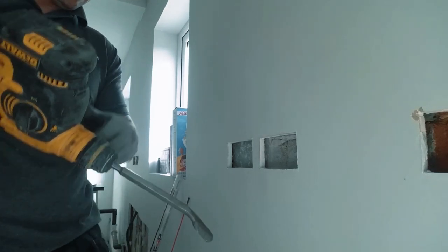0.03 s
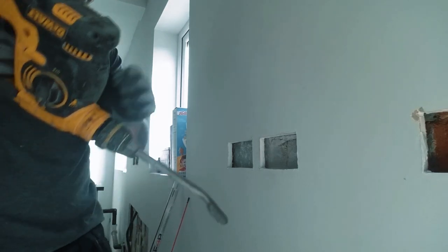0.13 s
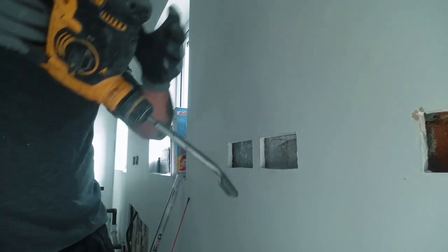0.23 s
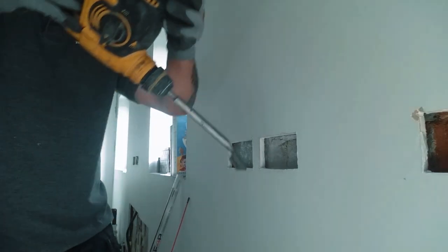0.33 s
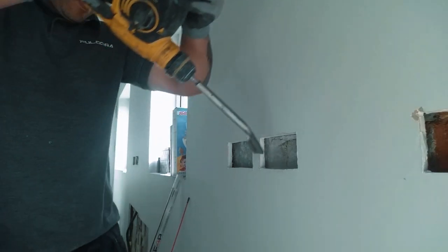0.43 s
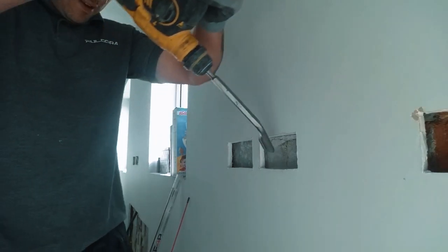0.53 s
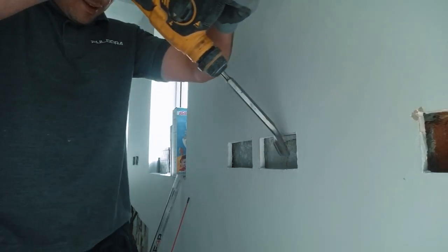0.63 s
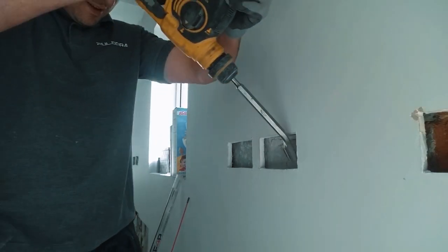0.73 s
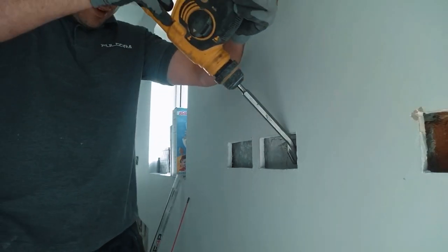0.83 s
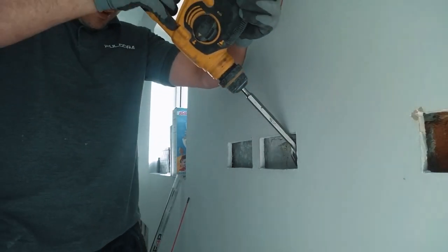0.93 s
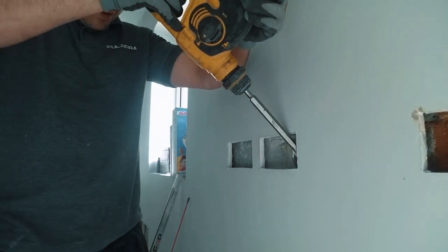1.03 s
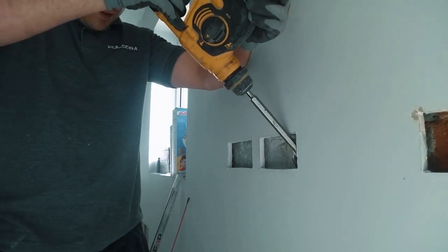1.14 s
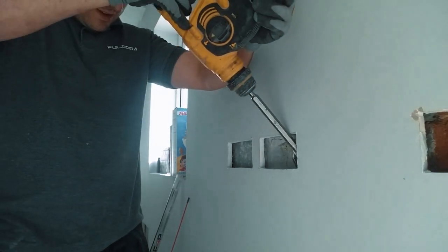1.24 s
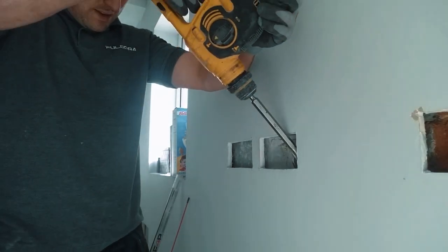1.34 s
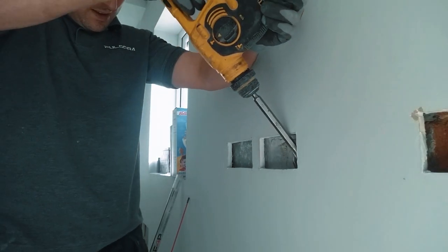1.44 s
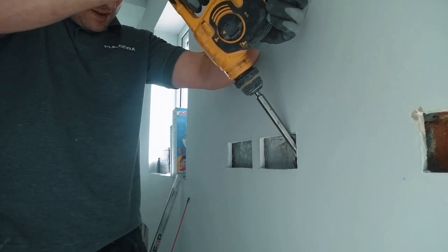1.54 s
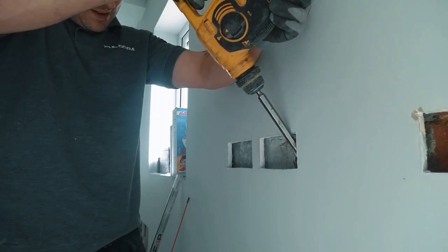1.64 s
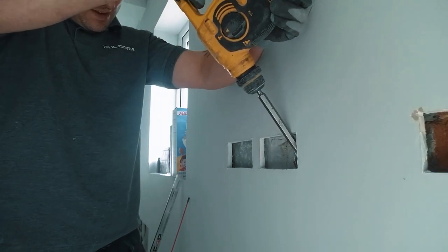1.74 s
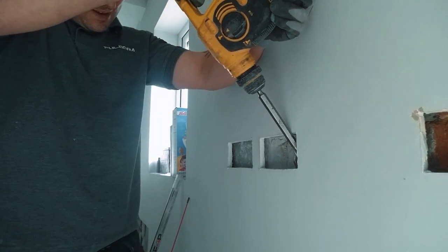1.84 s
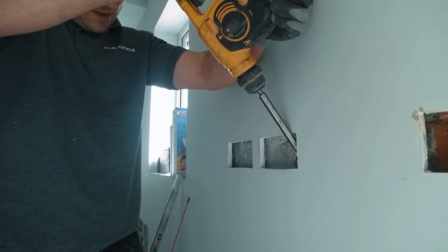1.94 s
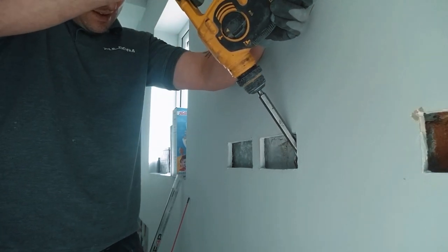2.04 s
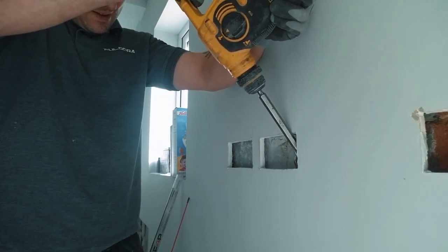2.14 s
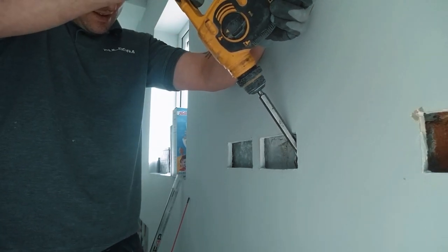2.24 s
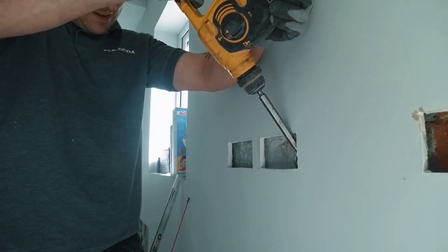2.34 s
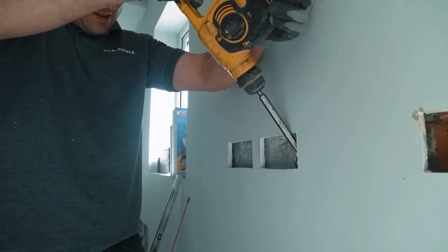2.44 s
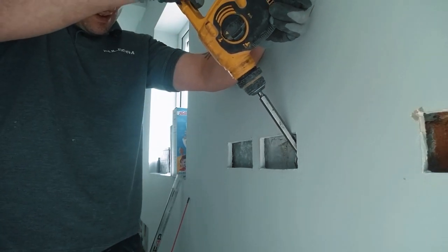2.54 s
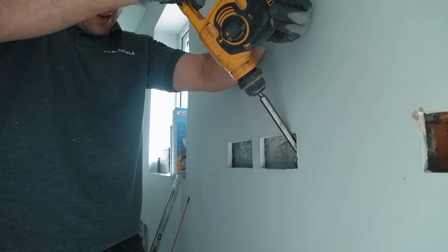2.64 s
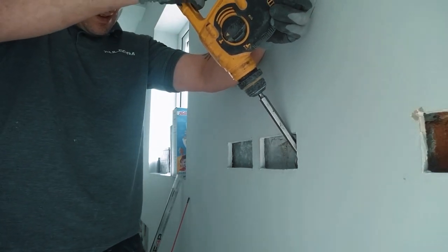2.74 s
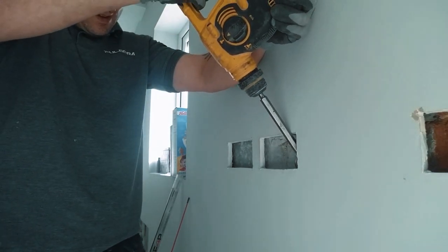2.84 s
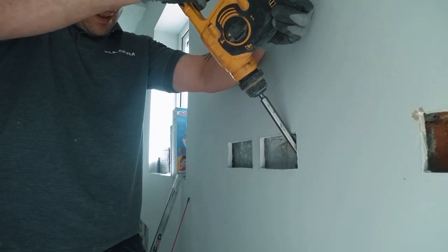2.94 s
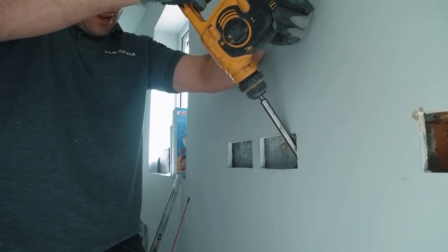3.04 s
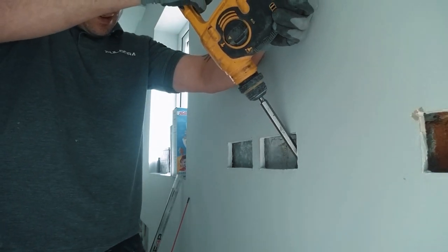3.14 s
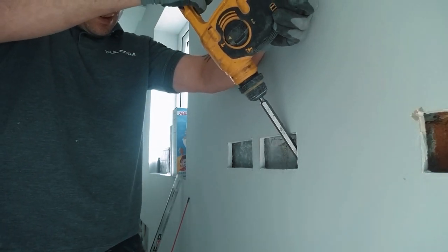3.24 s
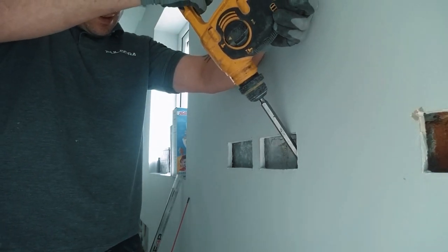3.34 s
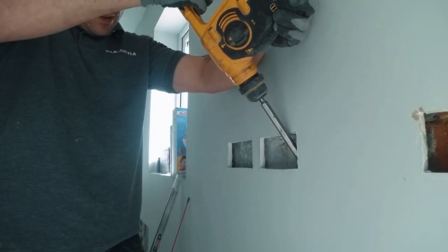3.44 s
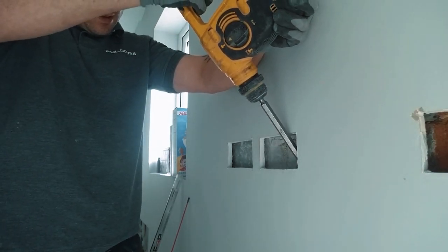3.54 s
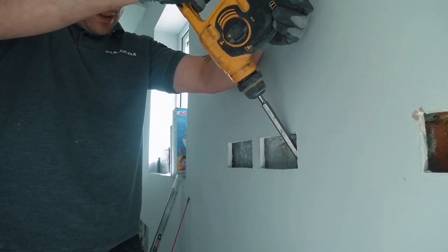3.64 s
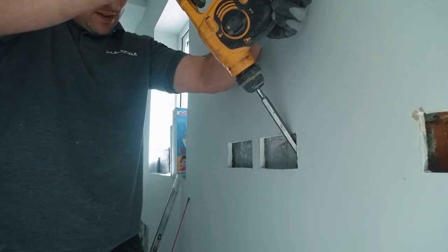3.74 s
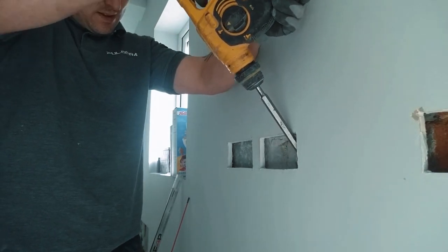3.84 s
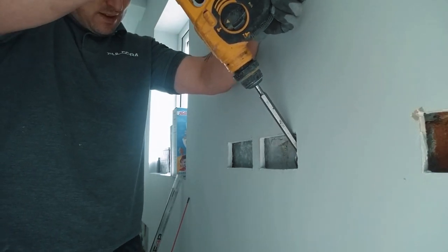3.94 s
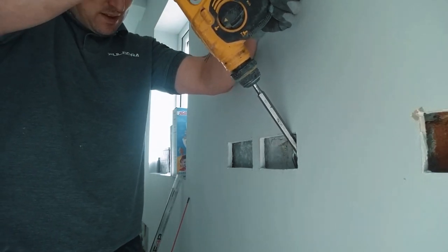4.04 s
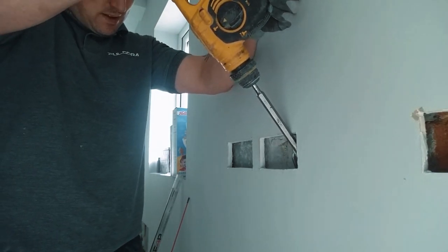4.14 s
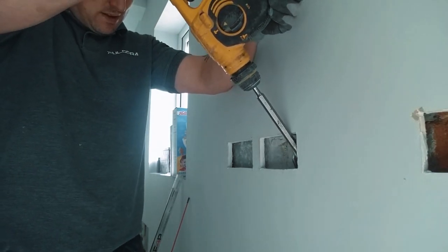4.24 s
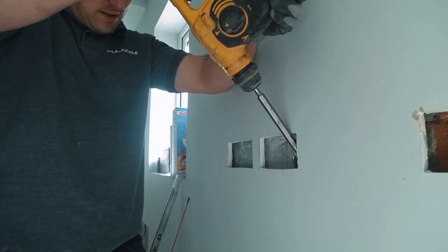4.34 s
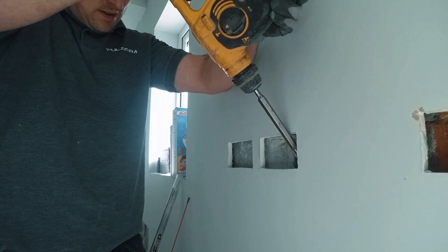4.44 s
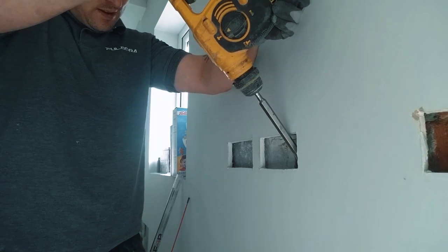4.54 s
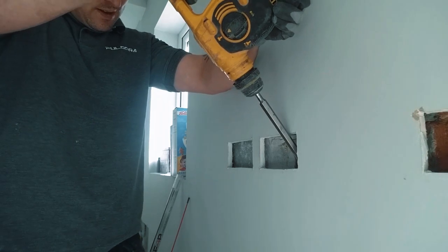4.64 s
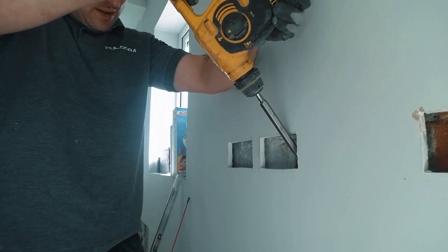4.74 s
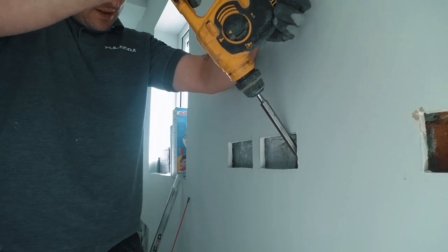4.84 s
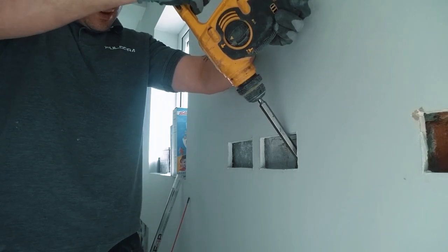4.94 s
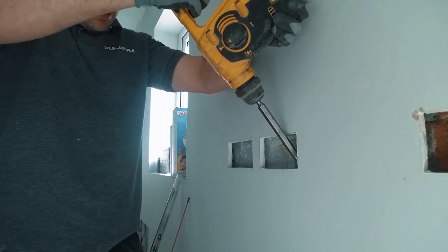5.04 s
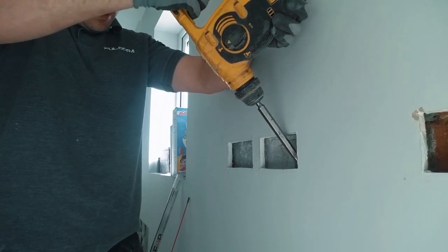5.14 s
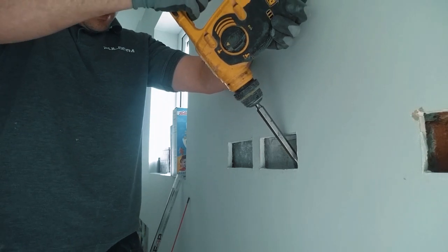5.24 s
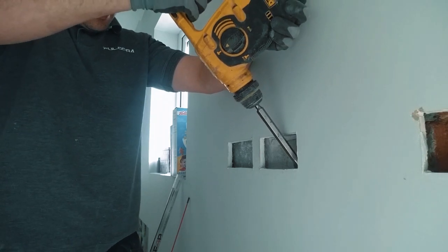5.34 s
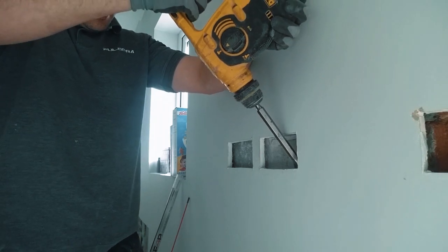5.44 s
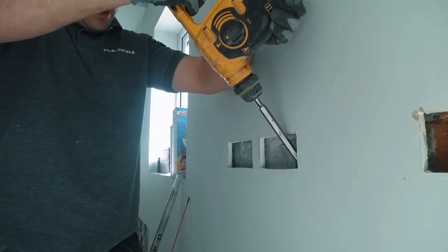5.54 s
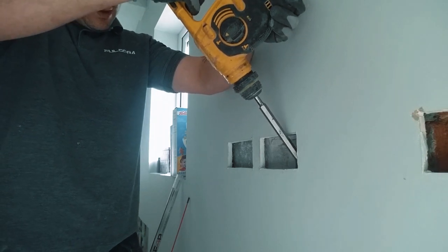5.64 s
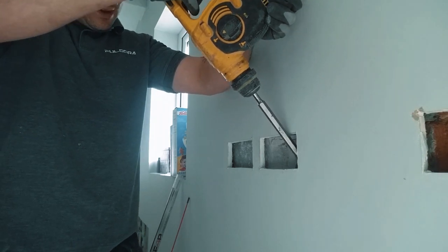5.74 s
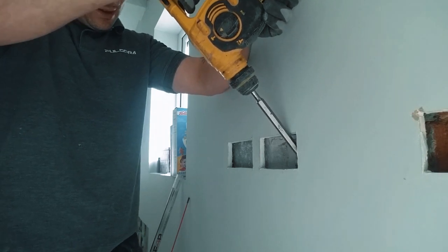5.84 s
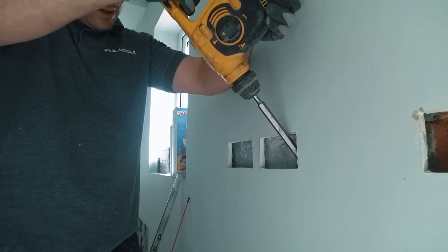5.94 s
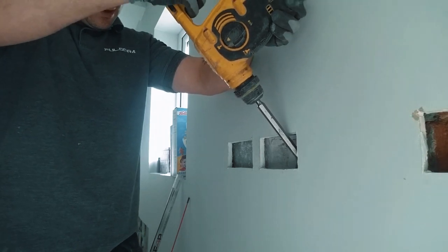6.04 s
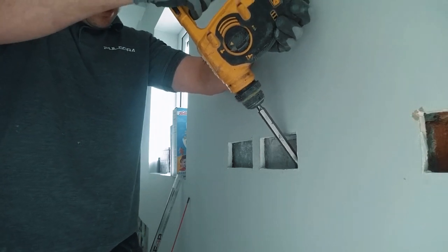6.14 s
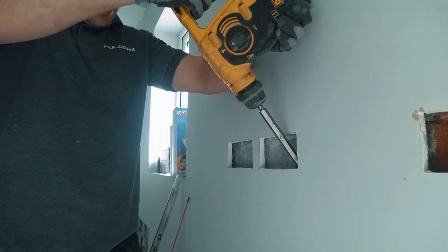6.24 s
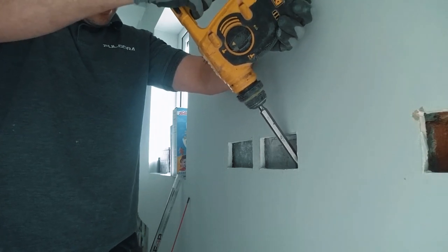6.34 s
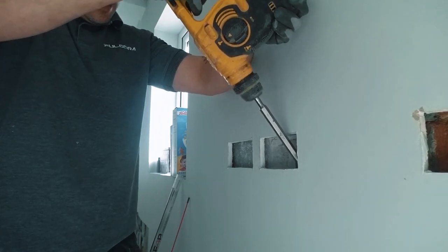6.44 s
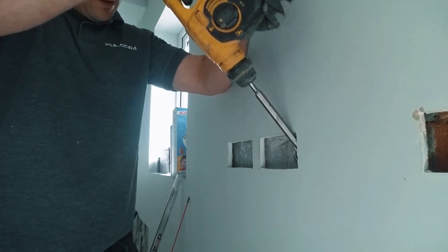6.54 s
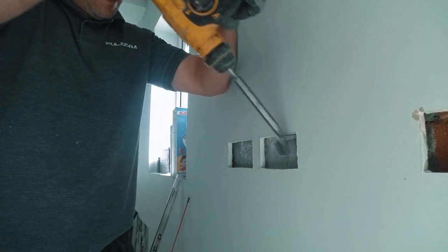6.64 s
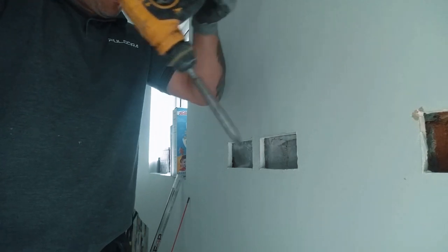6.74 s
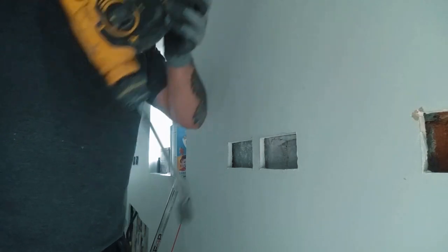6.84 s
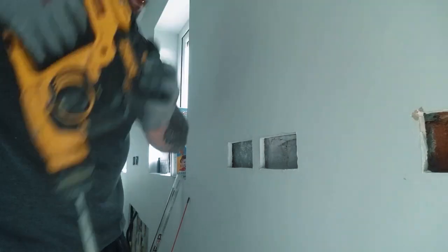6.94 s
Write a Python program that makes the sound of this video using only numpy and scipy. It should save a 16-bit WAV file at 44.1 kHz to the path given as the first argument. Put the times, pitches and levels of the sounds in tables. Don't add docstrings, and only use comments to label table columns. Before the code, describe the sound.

A bare, hard-walled room with a short bright echo, heard by a stereo microphone close to the wall. From 0 to 2 s there is faint low rumble, cloth rustle, soft hollow knocks and gritty steel ticks; a heavy knock lands at 0.9 s and a sharp one at 1.4 s. At 1.95 s a thin high electric whine appears and the hammer starts slowly, about 28 blows a second. From 2.55 to 3.9 s it runs at full speed, sixty blows a second: crackling plaster, bright ringing steel, droning housing, deep thumps mostly left, clipping hard. It coasts down into near quiet with light bumps and trigger clicks. A second, similar burst runs 4.57 to 5.8 s. Clicks come around 6.1 s, then a short, sharp burst from 6.24 to 6.65 s, closing with knocks, rustle and a faint tick.

```python
import sys
import numpy as np
from scipy import signal
from scipy.fft import rfft, irfft
from scipy.io import wavfile
from scipy.ndimage import uniform_filter1d

SR = 44100
rng = np.random.default_rng(int(sys.argv[2]) if len(sys.argv) > 2 else 0)


def store_wav(level_fs):
    pcm = np.round(np.clip(np.atleast_2d(level_fs), -1, 1) * 32767)
    wavfile.write(sys.argv[1], SR, pcm.T.astype(np.int16))


def level_to_linear(level):
    exponent = np.asarray(level, float) / 20
    return 10 ** exponent


N = 308733

# pitch_hz, level_db per Hz
RUMBLE = [(53, -40), (90, -7), (300, -3), (483, -21), (676, -11), (795, -10.5), (1200, -26.5), (1560, -75),
          (2640, -120)]
# pitch_hz, level_db per Hz
RUSTLE = [(290, -29.5), (500, -3), (721, -9.5), (1170, -8), (1520, -13.5), (3020, -15.5), (6100, -23.5),
          (14700, -29.5), (16500, -53)]
# level_db of rumble, rustle, draught
REST_DB = [-64.5, -66.5, -66.5]
# level_db of rumble, rustle, draught
DUCK_DB = [-12.5, -5.5, -19]
# centre_s, rise_db over rest, length_s
HANDLING = [(0.12, 15.5, 0.13), (0.408, 10.5, 0.058), (0.686, 5, 0.13), (1.07, 2.5, 0.12),
            (1.452, 17.5, 0.057), (1.58, 1.5, 0.055), (.54, 6, .03), (1.717, 4, 0.067), (4.16, 10, 0.16),
            (6.81, 12, .05)]

# start_s, peak_db, brightness_db per octave, left_over_right_db
KNOCKS = [(0.014, -37.5, -1.5, -1), (0.148, -35, 5, -2), (0.369, -32.5, -7, 1), (0.873, -6, -1.5, 6),
          (1.137, -31, 4, 4.0), (1.399, -22.5, 4.5, 2), (2.041, -24, 7, -5), (4.234, -45, -8, -1),
          (6.169, -38.5, 10, 1), (6.607, -26.5, 10, 1), (6.705, -23.5, 4.5, 4)]
# pitch_hz, level_db, t60_s
HOLLOW_MODES = [(123.6, -14, 0.75), (160, -28.5, 0.42), (200, -8, 0.69), (307, 3.5, 0.25),
                (354.5, -6.5, 0.57), (436, -9.5, 0.22), (494.3, -15.5, 0.38), (661.5, -5.5, 0.18),
                (830, -6.5, .15), (1210, -21, .2), (1333, -15.5, .3), (2333, -24, .2), (3350, -29.5, .15)]
# pitch_hz, level_db per Hz
THUD = [(47, -20), (80, -14.5), (325, -4), (421, -1.5), (493, 0), (776, -10), (857, -6.5), (1270, -21),
        (2440, -35.5), (9000, -72), (11700, -101), (19800, -120)]
# start_s, peak_db, pitch_hz
TICKS = [(.018, -36, 3670), (.08, -31, 1810), (0.113, -26.5, 3500), (0.15, -25, 3120), (0.385, -28.5, 2480),
         (.479, -39, 1740), (0.536, -33, 1890), (.691, -37, 1710), (0.8748, -16, 2330), (1.141, -35, 5100),
         (1.141, -29.5, 1650), (1.37, -54, 2500), (1.3993, -11.5, 1730), (1.442, -26, 1710),
         (1.442, -32, 5800), (1.781, -38, 1780), (1.968, -29, 1700), (1.463, -25, 1780), (1.646, -32, 2300),
         (1.7608, -42, 1780), (1.918, -37, 1780), (1.98, -19, 1655), (4.3527, -42.5, 1790),
         (4.475, -50, 1610), (4.485, -32, 1680), (6.141, -28.5, 2280), (6.187, -21.5, 5130),
         (6.701, -37, 2000), (6.9056, -42, 3040)]
# start_s, peak_db
TRIGGER_CLICKS = [(4.305, -41), (4.401, -37.5), (4.532, -38), (6.107, -27.5), (6.1665, -25.5)]

# pitch_hz, t60_s
ROOM_DECAY = [(100, 0.24), (260, 0.3), (700, 0.49), (1840, 0.42), (4850, 0.53), (9000, 0.31), (12800, 0.17),
              (15000, 0.15)]
# pitch_hz, level_db
WALLS = [(100, 1.5), (1000, -5.5), (5000, 0.5), (7500, 0), (10000, 0), (12000, -1.5), (16000, 4.5)]

# start_s, end_s, level_db
WHINE = [
    (1.955, 2.15, -50),
    (4.45, 4.56, -60),
]
# pitch_hz, level_db
WHINE_LINES = [(3900, 9), (7850, -2), (11750, -18)]
# pulled_s, let_go_s, crank_stop_s, drone_db, hiss_db
PULLS = [
    (1.967, 2.311, 2.385, -25, -35),
    (2.324, 3.804, 3.92, -26, -28),
    (4.477, 5.649, 5.787, -26.5, -30.5),
    (6.155, 6.585, 6.66, -29, -38.5),
]
# pitch_hz, width_hz, level_db
HOUSING = [(678.8, 32.3, 11), (751, 20, 3), (753, 15, 0.5), (898, 21, -8), (988, 19, -19.5)]

# first_blow_s, blow_count, gap_ms, gap_change_ms per blow, extra_first_gap_ms
RUNS = [
    (2.0394, 12, 35.53, .125, 58.3),
    (2.5517, 79, 16.684, .0013, 9.8),
    (4.568, 72, 17.56, -.0161, 4.4),
    (6.2388, 21, 17.88, -.1255, 5.2),
]
# crack_db, plaster_db, thump_db over the lean
STRENGTH = [(-27.5, -32.5, 2.5), (-22.5, -23.5, -0.5), (-20.5, -21, -0.5), (-18, -19.5, -2)]
COAST_LOSS_DB = [1.1, 0.73, 0.7]
SEATING_DB = [-1.5, -7.5, -1.5]
# time_s, level_db
LEAN = [
    [(2.04, -68), (2.2, -50), (2.52, -37.5)],
    [(2.62, -27.5), (3.12, -28.5), (3.25, -24.5), (3.37, -23.5), (3.45, -37), (3.52, -28.5), (3.79, -30.5),
     (3.87, -67.5)],
    [(4.57, -28.5), (4.61, -42.5), (4.66, -34.5), (4.84, -35), (5.3, -32), (5.67, -31), (5.71, -57.5)],
    [(6.24, -33.5), (6.38, -33), (6.59, -24.5), (6.62, -60)],
]
# time_s, level_db
BITE = [
    [(2.04, -7.5), (2.19, 6.5), (2.35, -3), (2.52, 0)],
    [(2.66, -1), (2.8, 0), (3.2, -0.5), (3.45, -0.5), (3.75, 5)],
    [(4.6, 2), (4.82, -0.5), (5.0, -0.5), (5.3, 3), (5.67, -1.5), (5.72, 4.5)],
    [(6.27, 1), (6.54, -0.5), (6.6, -3)],
]
GRIP_CHANGES = [3.3, 4.2, 5.1, 6.1]
# pitch_hz, t60_s, level_db in each of five grips
BIT_MODES = [(4770, 0.091, -31.5, -8, -8.5, -14.5, -8), (5405, 0.05, -6.5, -5.5, -6, -8.5, -7),
             (6010, 0.1, -10, -9.5, -12.5, -12.5, -14), (8010, .05, -24, -21, -20, -12, -7),
             (9100, .04, -22, -20, -20, -15, -12), (11850, .09, -6, -5, -8, -1, -3),
             (14700, 0.026, -7, 8.5, -13.5, 2.5, 5.5), (14500, 0.025, -26.5, -7, -12, -11, -14.5),
             (14400, .05, -31.5, -27.5, -19, -21.5, -16)]
# pitch_hz, level_db per Hz
CRACK = [(1470, -19.5), (2500, -3), (5730, -8), (7730, -9), (10900, -8), (11800, -2.5), (14300, -10),
         (16000, -11.5), (16500, -46)]
# pitch_hz, level_db per Hz
PLASTER = [(180, -49.5), (300, -11.5), (498, -8.5), (660, -5.5), (806, -2), (918, -2), (1200, -5),
           (1620, -3.5), (5000, -21.5), (6500, -82), (11000, -120)]
# pitch_hz, level_db per Hz
THUMP = [(12, -22), (20, -5), (81, 0.5), (114, 1), (147, 2.5), (179, 0), (209, 2.5), (600, 0.5), (780, -21),
         (1320, -120)]
# pitch_hz, left_over_right_db
PORT_BALANCE = [(60, 22.5), (110, 45.5), (200, 31.5), (380, 9), (700, 7.5), (1290, 10.5), (2380, 5.5),
                (4400, -1.5), (8120, 2), (15000, 7.5)]


def rms_one(x):
    return x / np.sqrt(np.mean(x ** 2) + 1e-20)


def at_hz(points, hz):
    points = np.array(points)
    return np.interp(np.log(hz), np.log(points[:, 0]), points[:, 1])


def colour(x, points):
    hz = np.maximum(np.arange(2049) * SR / 4096, 1)
    cepstrum = irfft(np.log(level_to_linear(at_hz(points, hz))))
    cepstrum[1:2048] *= 2
    cepstrum[2049:] = 0
    kernel = irfft(np.exp(rfft(cepstrum)))
    return signal.fftconvolve(np.atleast_2d(x), kernel[None], axes=1)[:, :N]


def impulses(s, size):
    out = np.zeros(N)
    index = np.clip(np.round(np.asarray(s) * SR).astype(int), 0, N - 1)
    np.add.at(out, index, size)
    return out + 1e-18


def dying(x, tau):
    return signal.lfilter([1], [1, -np.exp(-1 / (max(tau, 2e-4) * SR))], x)


def ring(x, hz, t60):
    r, w = level_to_linear(-60 / (t60 * SR)), 2 * np.pi * hz / SR
    return signal.lfilter([0, np.sin(w)], [1, -2 * r * np.cos(w), r * r], x)


def bandpass(low, high):
    return signal.butter(2, [low, high], "band", fs=SR, output="sos")


def pair(alike):
    mid, side = rng.standard_normal((2, N))
    alike = np.clip(alike, 0, 1)
    return np.sqrt(alike) * mid + np.sqrt(1 - alike) * side * [[1], [-1]]


def background():
    t = np.arange(N) / SR
    lift = sum(db * np.exp(-((t - s) / length) ** 2) for s, db, length in HANDLING)
    ducked = np.outer(DUCK_DB, t > 2.04)
    return np.array(REST_DB)[:, None] + ducked + np.outer([0.9, 1.0, 0.15], lift)


def air():
    rumble_db, rustle_db, draught_db = background()
    lumps = level_to_linear(1.2 * rms_one(uniform_filter1d(rng.standard_normal(N), 1500)))
    rumble = level_to_linear(rumble_db + 2.0) * rms_one(colour(pair(1.0), RUMBLE)) * level_to_linear([[2.5], [-2.5]])
    draught = level_to_linear(draught_db + 2.5) * rms_one(signal.sosfilt(bandpass(25, 85), pair(0.49)))
    rustle = level_to_linear(rustle_db + 5.0) * lumps * rms_one(colour(pair(0.5), RUSTLE))
    return rumble + draught + rustle


def knocks():
    out = np.zeros((2, N))
    size = 9000
    t = np.arange(size) / SR
    for s, db, bright_db, pan_db in KNOCKS:
        blow_and_bounce = impulses([0, .0081], [1, .4])[:size]
        contact = blow_and_bounce * (1 + .1 * rng.standard_normal((2, 1)))
        modes = 0
        for hz, level_db, t60 in HOLLOW_MODES:
            mode_db = level_db + bright_db * np.log2(hz / 330) + 2.2 * rng.standard_normal()
            modes = modes + level_to_linear(mode_db) * ring(contact, hz, min(0.67 * t60, 130.0 / hz))
        tilted = [(hz, level_db + bright_db * np.log2(hz / 330)) for hz, level_db in THUD]
        thud = colour(pair(0.97)[:, :size], tilted)[:, :size]
        thud = thud * np.minimum(t / 0.0046, 1) * np.exp(-t / 0.021)
        body = rms_one(modes) + 0.99 * rms_one(thud)
        pan = np.array([[pan_db], [-pan_db]]) / 2
        i = round(s * SR)
        out[:, i:i + size] += level_to_linear(db + pan) * body / np.abs(body).max()
    return signal.sosfilt(signal.butter(6, 92, "high", fs=SR, output="sos"), out)


def ticks():
    out = np.zeros((2, N))
    grit, edge = bandpass(900, 3650), bandpass(6000, 9200)
    # start_s, peak_db, pitch_hz, length_s, edge_db; the trigger is brighter and shorter
    rows = [(*row, .0065, -24) for row in TICKS]
    rows += [(*row, 1780, 0.0039, -2.5) for row in TRIGGER_CLICKS]
    for s, db, hz, length, edge_db in rows:
        i = round(s * SR)
        puff = rng.standard_normal((2, 3000))
        puff[1] = 0.29 * puff[0] + 0.53 * puff[1]
        voiced = rms_one(ring(puff, hz, 8.1 / hz))
        voiced += 0.45 * rms_one(signal.sosfilt(grit, puff))
        voiced += level_to_linear(edge_db - 8.0) * rms_one(signal.sosfilt(edge, puff))
        decay = np.exp(-np.arange(3000) / (max(length, .001) * SR))
        out[:, i:i + 3000] += (level_to_linear(db - 12.0) * voiced * decay)[:, :N - i]
    return out


def room(x):
    t, tail = np.arange(SR) / SR, 0
    for hz in 62.5 * 2 ** np.arange(0, 8.3, .5):
        band = bandpass(hz / 2 ** (1 / 4), min(hz * 2 ** (1 / 4), 20000))
        noise = signal.sosfilt(band, rng.standard_normal((2, SR)))
        tail = tail + noise * level_to_linear(-60 * t / at_hz(ROOM_DECAY, hz))
    tail = colour(tail, WALLS)[:, :SR] * np.clip((t - .004) / 0.0056, 0, 1)
    tail = tail / np.sqrt(np.sum(tail ** 2) / 2)
    return signal.fftconvolve(x[None], tail, axes=1)[:, :N]


def whine():
    t, lines, on = np.arange(N) / SR, 0, 0
    for hz, db in WHINE_LINES:
        lines = lines + level_to_linear(db) * rms_one(ring(rng.standard_normal(N), hz, .14))
    for a, b, db in WHINE:
        on = on + level_to_linear(db) * np.interp(t, [a, a + .03, b - .01, b], [0, 1, 1, 0])
    return on * lines


def throttle():
    t, drone, hiss = np.arange(N) / SR, 0, 0
    choke_s, swell_s, swell_db = 0.027, .025, 0.5
    for on, off, stop, drone_db, hiss_db in PULLS:
        turning_db = np.interp(t, [on, on + 0.088], [-15.5, 0])
        turning_db = turning_db - 301 * np.maximum(t - stop, 0)
        free_db = np.interp(t, [off - choke_s, off, off + swell_s, stop], [0, -17.5, swell_db, 0.25 * swell_db])
        drone = np.maximum(drone, (t > on) * level_to_linear(drone_db + turning_db + free_db))
        hiss = np.maximum(hiss, (t > on) * level_to_linear(hiss_db + 1.4 * turning_db))
    wander = uniform_filter1d(uniform_filter1d(rng.standard_normal((2, N)), 1800), 1800)
    return level_to_linear(1.8 * rms_one(wander)) * [drone, hiss]


def motor(recoil):
    droning, hissing = throttle()
    rattle = rng.standard_normal(N) * (0.084 + dying(dying(recoil, 0.0033), 0.005) / 90)
    push_and_return = recoil - np.roll(recoil, 32)
    shake = rattle + 9 * push_and_return
    drone = 0
    for k, (hz, width, db) in enumerate(HOUSING):
        mode = level_to_linear(db) * np.sqrt(width) * ring(shake, hz, 1.9 / width)
        drone = drone + mode * (-1) ** k
    evenness = uniform_filter1d(rattle ** 2, 2400) ** .5
    gears = [(300, -46.5), (900, 0.5), (3000, -5.5), (6500, -22.0), (8000, -34.5), (15000, -27.0)]
    hiss = rms_one(colour(pair(.6), gears))
    return droning * rms_one(drone / evenness) + hissing * hiss + whine()


def blows():
    rows = []
    for run, (s, count, gap, change, extra) in enumerate(RUNS):
        k = np.arange(count)
        coast = (run > 0) * 11.3 * .58 ** (count - 1. - k)
        spin_up = extra * .31 ** k[:-1]
        gaps = np.append(0, gap + change * k[:-1] + spin_up + coast[1:])
        rows.append([s + np.cumsum(gaps) / 1000, run + 0 * k, coast, .5 ** k])
    s, run, coast, fresh = np.concatenate(rows, axis=1)
    return s + .0002 * rng.standard_normal(len(s)), run.astype(int), coast, fresh


def force(s, run, coast, fresh):
    bite = np.interp(s, *np.concatenate(BITE).T)
    lean = np.interp(s, *np.concatenate(LEAN).T)
    effort = np.array([0.16 * bite, bite, lean])
    return np.array(STRENGTH)[run].T + effort - np.outer(COAST_LOSS_DB, coast) + np.outer(SEATING_DB, fresh)


def bit_ring(s, size_db, pace):
    grip = np.searchsorted(GRIP_CHANGES, s)
    steel, strike = 0, rng.standard_normal((len(s), len(BIT_MODES), 2))
    for k, (hz, t60, *level_db) in enumerate(BIT_MODES):
        size = pace * level_to_linear(size_db + np.array(level_db)[grip] + 6.0 + 1.8 * strike[:, k, 0])
        jolt = dying(impulses(s + abs(.0015 * strike[:, k, 1]), size), .0025)
        jolt = jolt * rng.standard_normal(N) / 12
        steel = steel + ring(jolt, hz * .991, .5 * t60) + ring(jolt, hz * 1.009, .4 * t60)
    return steel


def wall_thump(s, thump_db, pace, luck):
    dent = impulses(s + .0005, pace * level_to_linear(thump_db - 2.5 + 1.5 * luck[:, 4]))
    spring_back = impulses(s + 0.0036 + 0.00063 * luck[:, 0], pace * level_to_linear(thump_db + 6.4 * luck[:, 5]))
    push = spring_back - dent
    judder = dying(impulses(s, pace * level_to_linear(thump_db + 2.1 * luck[:, 7])), 0.0027)
    judder = 0.17 * judder * rng.standard_normal(N)
    stray = impulses(s + .004, pace * level_to_linear(thump_db - 10.0) * luck[:, 6])
    ports = colour([push + judder, stray + level_to_linear(-30.5) * push], THUMP)
    return level_to_linear(-1.5) * ports / colour(impulses(s, 1.), THUMP).std()


def hammer():
    s, run, coast, fresh = blows()
    pace = np.sqrt(np.clip(np.diff(s, append=9), 0, .04) * 60)
    crack_db, plaster_db, thump_db = force(s, run, coast, fresh)
    luck = rng.standard_normal((len(s), 8))
    rebound_s = s + .0035 + .0012 * luck[:, 0]

    def burst_of_noise(db, tau, rebound_db, spectrum, alike):
        size = pace * level_to_linear(db)
        rebound = impulses(rebound_s, size * level_to_linear(rebound_db + 2.64 * luck[:, 1]))
        envelope = dying(impulses(s, size) + rebound, tau)
        return colour(envelope * pair(alike), spectrum) / colour(pair(alike), spectrum).std()

    crack = burst_of_noise(crack_db + 10 + 2.6 * luck[:, 2], 0.0026, -10, CRACK, 0.46)
    plaster = burst_of_noise(plaster_db + 10.5 + 1.03 * luck[:, 3], 0.0035, -5.5, PLASTER, 0.86)
    thump = wall_thump(s, thump_db, pace, luck)
    steel = bit_ring(s, crack_db, pace)
    recoil = impulses(s + .0045 * pace, pace * (1 - 0.78 * fresh ** 2))
    return crack + plaster + steel, thump, recoil


def scene():
    small = knocks() + ticks()
    airborne, thump, recoil = hammer()
    left, right = airborne + motor(recoil)
    shadow = [(hz, -db) for hz, db in PORT_BALANCE]
    right = colour(np.roll(right, 8), shadow)[0]
    wet = level_to_linear([[-5], [-7.5]]) * room(left + level_to_linear(-16.5) * thump[0])
    wet = wet + level_to_linear(-4.5) * room(small.mean(axis=0))
    return np.array([left, right]) + thump + small + wet + air()


def top_cut(x):
    return signal.sosfilt(signal.butter(12, 16780, fs=SR, output="sos"), x)


def record(dry):
    cut = signal.cheby2(12, 60, 16700, fs=SR, output="sos")
    overloaded = np.clip(dry, -1.05, 1.05)
    mix = np.clip(signal.sosfilt(cut, overloaded), -1, 1)
    return top_cut(mix)


dry = scene()
out = record(dry)
store_wav(out)
```